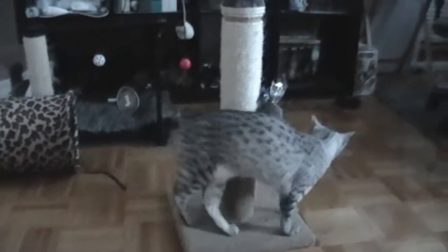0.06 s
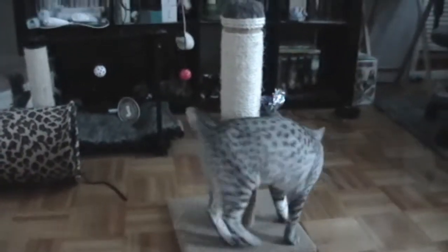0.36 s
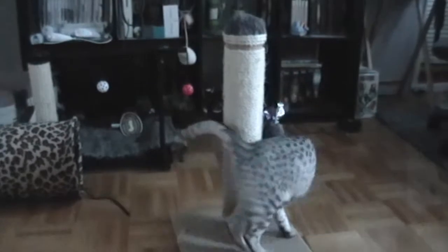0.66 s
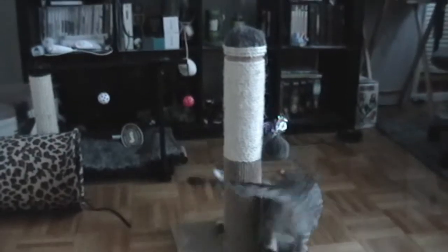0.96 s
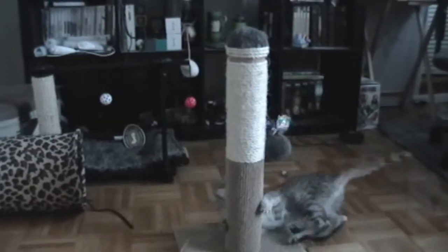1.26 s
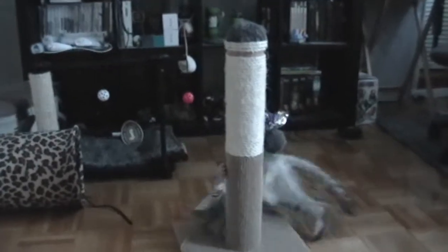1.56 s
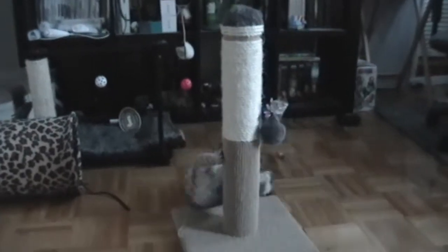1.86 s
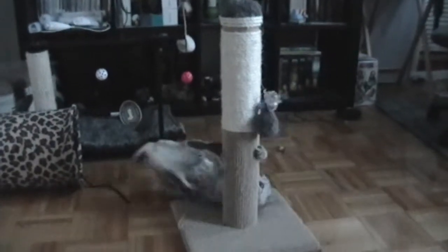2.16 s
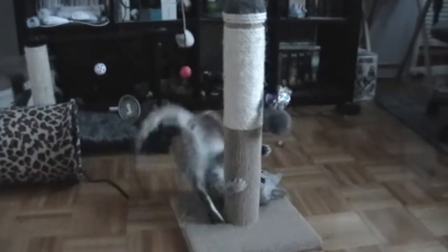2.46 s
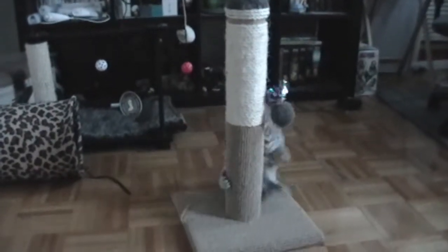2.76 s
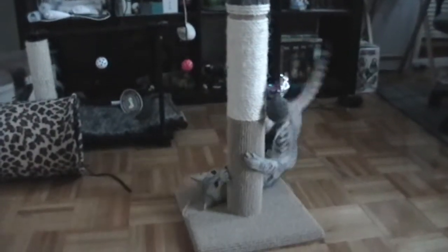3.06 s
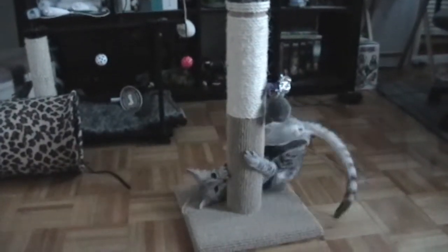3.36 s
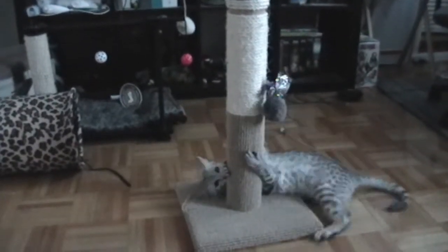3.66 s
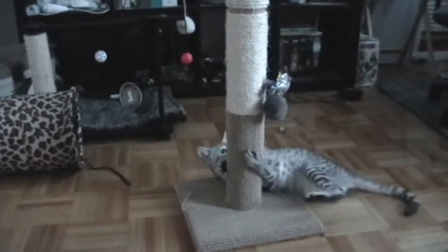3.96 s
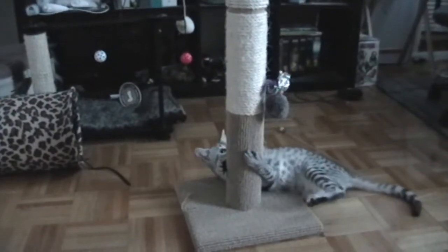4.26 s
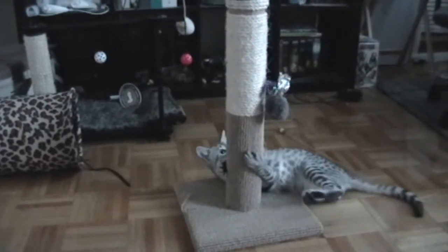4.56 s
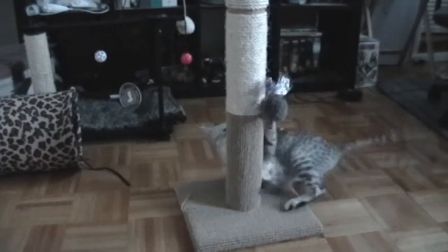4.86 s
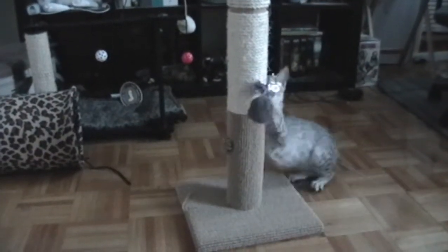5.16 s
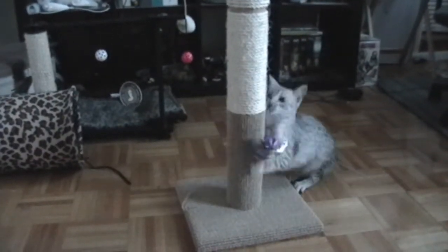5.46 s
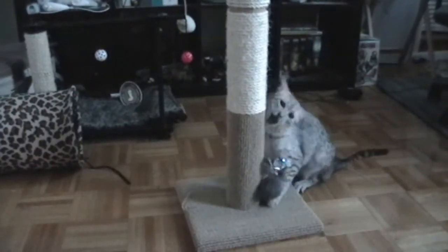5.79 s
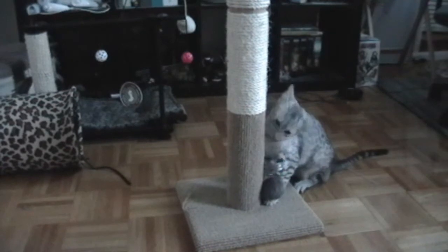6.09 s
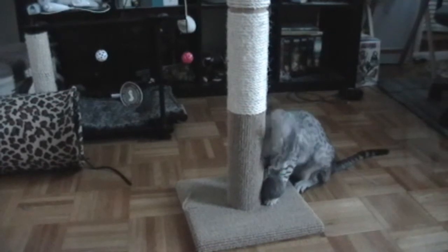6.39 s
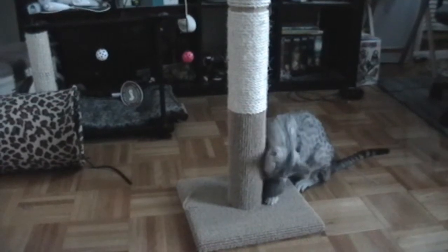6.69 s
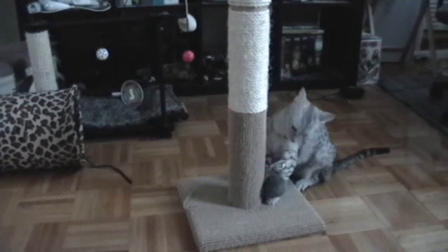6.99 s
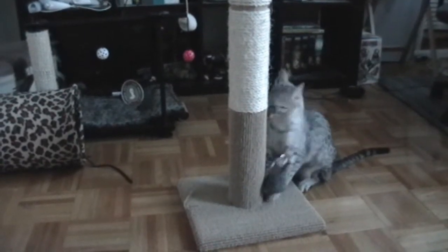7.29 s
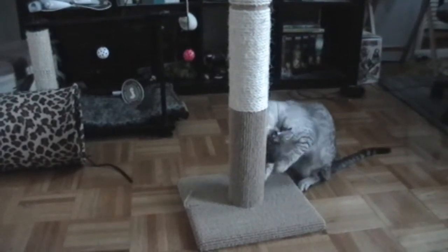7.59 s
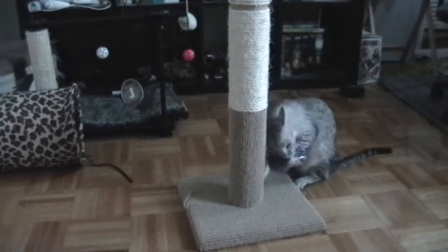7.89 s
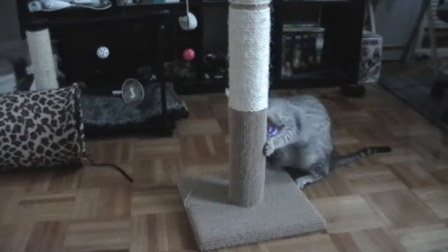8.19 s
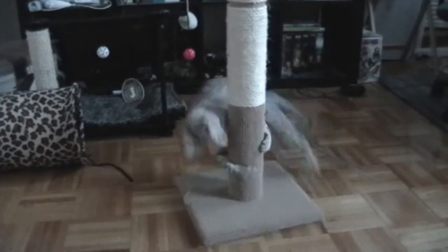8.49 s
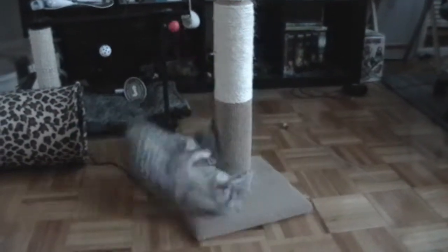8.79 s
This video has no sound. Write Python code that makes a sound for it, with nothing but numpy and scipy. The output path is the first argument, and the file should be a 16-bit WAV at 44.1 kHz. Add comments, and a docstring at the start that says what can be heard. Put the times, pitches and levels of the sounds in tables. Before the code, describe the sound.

A kitten's claws rasp and snap on a rope scratching post, with soft thumps and the crinkle of a foil toy indoors.

```python
"""A kitten claws a rope-wrapped scratching post in a living room with a parquet floor.
Its claws rasp over the fibres in tiny stick-slip grains, rip through them and snap free; its body
thumps the carpeted base. It bats and paws a dangling toy whose foil tuft crinkles and swishes and whose
trinket tinkles. Paws and toy brush the carpet. The room answers briefly and hums softly underneath."""
import sys
import numpy as np
from scipy import signal
from scipy.fft import rfft, irfft, next_fast_len
from scipy.io import wavfile

SR = 44100
rng = np.random.default_rng(int(sys.argv[2]) if len(sys.argv) > 2 else 0)


def wrap_up_sound(samples):
    """Save the sound to the file named by the first command line argument, as 16-bit audio."""
    columns = np.atleast_2d(samples).T
    # keep every value between -1 and 1, then stretch to whole-number steps
    tamed = np.clip(columns, -1, 1)
    steps = np.round(tamed * 32767).astype(np.int16)
    wavfile.write(sys.argv[1], SR, steps)


N = 389844
TOP_HZ, HIT_SAMPLES = 14600, 8192

# Claws snapping free of the rope (all cue levels are pre-fader): start_s, level_db, pitch_hz, width_oct
CLAW_SNAPS = [(1.2157, -35.5, 4500, 0.66), (1.3506, -50, 4000, 0.97), (1.4083, -37, 3200, 1.06),
              (1.451, -23.5, 2300, 1.04), (1.5278, -35.5, 2940, 0.83), (1.5425, -43, 5000, 0.88),
              (1.554, -43, 6000, 0.6), (1.5975, -37.5, 4000, 1.7), (1.668, -33.5, 3740, 0.81),
              (1.7882, -39, 4000, 0.74), (1.846, -42, 2200, 0.72), (1.9434, -25, 2970, 0.6),
              (1.946, -25, 4500, 0.32), (2.0799, -24.5, 3320, 0.8), (2.1666, -26, 3830, 0.86),
              (2.2809, -22.5, 3730, 0.78), (2.2965, -24.5, 3420, 1), (2.348, -33, 5500, 0.87),
              (2.3634, -25, 3340, 0.66), (2.4052, -24, 3350, 0.43), (2.4313, -37, 3260, 0.44),
              (2.4553, -25, 2080, 0.32), (2.559, -37, 3500, 1.1), (2.5675, -27.5, 1220, 0.81),
              (2.603, -31, 4000, 0.97), (2.6086, -29.5, 4020, 1.26), (2.6631, -29, 3000, 1.24),
              (2.701, -21, 2960, 1.15), (2.7464, -24.5, 1920, 0.63), (2.7858, -31, 5960, 0.45),
              (2.797, -26.5, 1990, 1.7), (2.926, -24, 2770, 0.7), (2.9819, -20, 3140, 1.18),
              (2.9962, -25, 4800, 0.26), (3.0236, -30, 4500, 0.74), (3.163, -36, 2100, 0.76),
              (3.2287, -44, 4500, 1.2), (3.343, -39, 3900, 1.15), (3.3654, -45, 4040, 0.7),
              (3.6481, -29.5, 3800, 1.1), (3.729, -40.5, 4500, 1.1), (3.734, -45, 4500, 1),
              (3.7773, -38.5, 3930, 0.75), (3.7919, -45, 4000, 0.41), (3.8966, -53, 5500, .9),
              (4.6938, -21.5, 2760, 1.03), (4.7081, -24.5, 2940, 0.87), (4.715, -27.5, 2600, 0.88),
              (4.9073, -36.5, 2000, .5), (4.939, -32.5, 4500, 0.67), (4.9632, -26, 4940, 0.59),
              (5.0042, -30, 5200, 0.62), (5.0485, -28, 4630, 1.12), (5.0982, -35.5, 4950, 0.5),
              (5.1655, -31, 5150, 0.54), (5.18, -23.5, 3680, 0.86), (5.1829, -29.5, 3020, 0.76),
              (8.3532, -29, 3380, 0.81), (8.398, -28.5, 5000, 0.69), (8.4079, -32, 4800, 0.74),
              (8.5714, -27, 2750, 0.54), (8.639, -27, 5470, 0.48), (8.677, -22, 1490, 0.84),
              (8.6845, -24.5, 1890, .7), (8.7142, -19.5, 2340, 1.3)]
def claw_snaps():
    """A fibre creaks under strain, lets go, and the claw catches again within a millisecond or two."""
    return on_post(snaps(CLAW_SNAPS, catch_gap_s=.0004, catch_gain=0.5))


# Louder rips along the rope, one of them the body sliding low against the post at 1.22 s: start_s, level_db,
# length_s, pitch_hz
CLAW_RIPS = [(1.063, -47, .016, 3660), (1.206, -45.5, 0.027, 3770), (1.223, -51.5, 0.046, 326),
             (1.452, -41, 0.0049, 700), (1.538, -45, 0.011, 6000), (1.596, -42, 0.012, 3480),
             (1.646, -40, 0.043, 3250), (1.789, -41.5, 0.018, 1180), (1.84, -45.5, .007, 1870),
             (1.871, -47.5, 0.013, 1890), (1.942, -34.5, 0.019, 3100), (2.074, -32, 0.0083, 2230),
             (2.159, -40.5, 0.034, 2500), (2.21, -44, 0.016, 1000), (2.262, -37, 0.058, 3040),
             (2.677, -35.5, 0.02, 3050), (2.784, -34, 0.02, 3260), (3.0, -41, 0.022, 4200),
             (3.023, -27, .016, 3450), (3.304, -47, 0.019, 1100), (3.444, -45, 0.019, 2880),
             (3.468, -34.5, 0.035, 3720), (3.644, -36, 0.011, 2500), (4.695, -34.5, 0.041, 2430),
             (4.767, -38, 0.0083, 2480), (4.841, -31, 0.0079, 5700), (4.909, -40.5, 0.013, 2070),
             (5.156, -39.5, 0.03, 3820), (8.397, -39.5, 0.027, 4150), (8.638, -31, 0.011, 2800),
             (8.677, -32.5, 0.016, 1800), (8.715, -34.5, 0.018, 2100)]
def claw_rips():
    """Claws tear through the fibres, and once the body slides low against the post; a short, quiet tear also
    sits under every snap."""
    strong_rips = [(*row, 0.99) for row in CLAW_RIPS]  # width in octaves
    tears = [(start_s, db - 25, .012, pitch_hz, octaves) for start_s, db, pitch_hz, octaves in CLAW_SNAPS]
    return on_post(rips(strong_rips + tears, per_s=4000, scatter_db=5.0))


# Claw strokes on the rope: start_s, length_s, level_db
CLAW_DRAGS = [(1.22, 0.059, -49), (1.41, 0.34, -47), (1.82, 0.4, -45.5), (2.2, 0.33, -43),
              (2.55, 0.34, -43.5), (2.94, 0.23, -43), (3.63, 0.068, -43.5), (4.69, 0.076, -41),
              (4.89, 0.53, -49), (8.35, 0.048, -44.5), (8.5, 0.089, -38), (8.64, 0.15, -41.5)]
# Tone of the rope: freq_hz, gain_db
ROPE_EQ = [(40, -55), (200, -8), (400, -4.5), (580, 7), (800, 2.5), (1150, 2.5), (1900, 0), (3400, -9.5),
           (6000, -10), (9000, -12), (11500, -13), (14000, -42)]
def rope_rasp():
    """Dragging claws stick and slip over the fibres, more scrape than fizz."""
    pressure = strokes(CLAW_DRAGS, attack_s=0.0009, release_s=0.055, arch_db=6.0)
    return rasp(pressure, crackle(ROPE_EQ, per_s=1000, scatter_db=6.0),
                split_hz=2800, scrape_db=-2.0, fizz_db=-9.5)


# Hollow ring of the post: freq_hz, width_hz, gain_db
POST_MODES = [(575, 173, 10), (810, 86, 6), (1900, 820, -7), (6620, 4200, -4.5)]
def on_post(x, travel_s=0.000788, at_hz=996, front_hz=6900):
    """The post rings under a contact; treble travels faster in it, so each click chirps downwards."""
    lag_cycles = lambda hz: travel_s * np.sqrt(at_hz) * (2 * np.sqrt(hz) - hz / np.sqrt(front_hz))
    return filtered(x, lambda hz: (1 + modes(POST_MODES, hz)) * np.exp(-2j * np.pi * lag_cycles(hz)))


# Body or paw landing on the base: start_s, level_db, pitch_hz, weight_vs_contact_db
BODY_THUMPS = [(.977, -42.5, 145, -15), (1.079, -36, 133, -9), (1.245, -47, 320, -20),
               (1.47, -52, 110, -15), (1.692, -47.5, 157, -3), (1.772, -35.5, 181, -21),
               (1.794, -35.5, 211, -20), (2.0595, -31.5, 185, -1.5), (2.075, -37, 302, -15),
               (2.178, -37.5, 290, -20), (2.26, -30.5, 210, -4), (2.268, -27, 350, 0),
               (2.294, -26, 382, -11.5), (2.331, -31.5, 320, -8), (2.376, -41.5, 370, -17),
               (2.795, -43, 282, -12), (3.03, -49, 280, -10), (3.117, -39.5, 420, -21),
               (3.126, -37, 239, -15), (3.647, -37.5, 190, -21), (4.696, -37.5, 272, -12),
               (4.844, -26.5, 235, -12), (5.385, -49.5, 200, -10), (5.46, -48.5, 220, -9),
               (8.523, -43, 294, -17), (8.64, -25.5, 255, -14), (8.714, -34, 310, -13),
               (8.805, -43, 150, -18)]
# Woody ring of post and base: freq_hz, width_hz, gain_db
BASE_MODES = [(62.5, 5.1, 15), (134, 37, 5.5), (172, 64, -3), (285, 71, 4.5), (347, 42, 6), (517, 85, 4.5),
              (770, 640, 8)]
def body_thumps(rattle_gain=0.055, rattle_s=0.011, weight_lag_s=0.0061):
    """A blow rings the post and its base, which rocks briefly; the body's weight settles just after."""
    out, t = np.zeros(N), np.arange(HIT_SAMPLES) / SR
    weight = resonate(signal.unit_impulse(HIT_SAMPLES), pitch_hz=117, octaves=0.37, low_hz=90)
    for start_s, db, pitch_hz, weight_db in BODY_THUMPS:
        blow = rattle_gain * rng.standard_normal(HIT_SAMPLES) * np.exp(-t / rattle_s)
        blow[0] += 1
        thud = resonate(blow, pitch_hz, octaves=0.64, low_hz=74.6)
        add(out, start_s, filtered(thud, lambda hz: modes(BASE_MODES, hz)), db, hold_s=0.019)
        add(out, start_s + weight_lag_s, weight, db + weight_db, hold_s=0.019)
    return out


# Featured pops of the toy's foil: start_s, level_db, pitch_hz
FOIL_POPS = [(0.563, -60, 7500), (.7648, -56, 6500), (2.4544, -23.5, 5900), (2.456, -21, 6180),
             (4.9488, -31, 6300), (4.98, -29, 6100), (4.982, -30, 6100), (5.069, -37, 6800),
             (5.082, -37, 6500), (5.3718, -31, 6500), (5.377, -28.5, 6300), (5.446, -29.5, 4870),
             (5.499, -38, 9000), (5.5237, -39, 5950), (5.5624, -45, 7000), (5.579, -38, 6700),
             (5.6573, -31, 4770), (5.71, -36, 6400), (5.749, -40, 7500), (5.775, -39, 7700),
             (5.7794, -41, 7700), (5.812, -38.5, 7600), (5.8188, -44, 6500), (5.824, -41.5, 5500),
             (5.855, -37, 7820), (5.86, -42, 7000), (5.875, -41.5, 6260), (5.8881, -42, 5800),
             (5.9031, -45, 6800), (5.928, -47, 7000), (5.951, -48, 5000), (5.9899, -42.5, 4580),
             (6.455, -44.5, 8200), (6.503, -43, 9500), (6.5476, -36.5, 4160), (6.605, -40, 7000),
             (6.618, -44, 7500), (6.667, -43, 9000), (6.71, -42, 6000), (6.7715, -41, 8000),
             (6.775, -42, 9000), (6.8175, -44, 8500), (6.9324, -43, 9600), (7.0015, -42.5, 10100),
             (7.4805, -60, 6500), (7.52, -62, 5000), (7.587, -50, 9500), (7.695, -37, 10400),
             (7.817, -44, 6400), (7.9684, -39.5, 7100), (8.151, -29, 7900), (8.2099, -23, 6160),
             (8.215, -26, 4900), (8.225, -18, 5900), (8.229, -21, 6200), (8.242, -25.5, 5000),
             (8.248, -30, 5950), (8.263, -34, 7400), (8.2925, -34, 5300), (8.327, -37.5, 5460)]
def foil_pops(grip, crinkles_per_s=110, threshold_db=-52, crinkle_hz=6800, width_oct=0.32):
    """Creases pop; a firm enough grip adds small random crinkles that grow louder with it."""
    count = int(crinkles_per_s * N / SR)
    places, chances = rng.integers(N, size=count), rng.standard_normal((count, 2))
    excess_db = 20 * np.log10(grip[places] + 1e-20) - threshold_db
    crinkles = [(place / SR, -55 + 0.13 * excess + 3 * accent, crinkle_hz * 2 ** (0.25 * detune))
                for place, excess, (accent, detune) in zip(places, excess_db, chances) if excess > 0]
    creases = [(*row, width_oct) for row in FOIL_POPS + crinkles]
    return on_toy(snaps(creases, catch_gap_s=.0005, catch_gain=0.61))


# Paws gripping the foil: start_s, length_s, level_db
FOIL_GRIPS = [(4.92, 0.089, -36), (5.315, 0.37, -42), (5.69, 0.31, -49), (7.45, 0.76, -60.5),
              (7.86, 0.14, -49), (8.13, 0.13, -36.5), (8.4, 0.13, -39.5), (8.5, 0.096, -41),
              (8.71, 0.15, -34.5)]
def foil_grip():
    """Paw pressure on the foil, which drives its rustle and its crinkles."""
    return strokes(FOIL_GRIPS, attack_s=0.0046, release_s=0.019, arch_db=3.0)


# Tone of the foil: freq_hz, gain_db
FOIL_EQ = [(60, -50), (350, -2.5), (650, 1), (1150, -1), (1420, -1), (1690, 0.5), (2430, -3), (3020, -1.5),
           (3600, -4.5), (4800, 2), (7060, 3), (13800, -7.5), (15000, -41)]
def foil_rustle(grip):
    """Handled foil sticks and slips, more fizz than scrape."""
    return rasp(grip, crackle(FOIL_EQ, per_s=1500, scatter_db=4.5),
                split_hz=3800, scrape_db=-9.5, fizz_db=-4.5)


# Paw swipes at the toy: start_s, level_db, length_s
TOY_SWIPES = [(.265, -56, 0.0088), (0.3, -58, 0.0065), (0.76, -53.5, 0.032), (4.927, -39.5, 0.056),
              (5.338, -29.5, 0.017), (5.35, -39.5, 0.06), (5.568, -44.5, 0.033), (5.599, -35, 0.033),
              (5.748, -39.5, 0.0092), (7.694, -50.5, 0.018), (7.874, -37.5, 0.035), (8.109, -28.5, .01),
              (8.176, -35.5, 0.02), (8.207, -31, 0.035), (8.513, -33.5, 0.022)]
def toy_swipes(pitch_hz=8900, width_oct=0.83):
    """A paw skims the foil in a bright swish of dense slips."""
    return on_toy(rips([(*row, pitch_hz, width_oct) for row in TOY_SWIPES], per_s=12000, scatter_db=6.0))


# Ring of the foil tuft: freq_hz, width_hz, gain_db
TUFT_MODES = [(1800, 480, 11.5), (4650, 340, -14), (5670, 480, -4), (6830, 2600, -3.5)]
def on_toy(x):
    """The foil tuft adds its thin ring to a contact."""
    return filtered(x, lambda hz: 1 + modes(TUFT_MODES, hz))


# Shakes of the toy's trinket: start_s, level_db
TINKLES = [(.008, -60.5), (.06, -59), (.138, -60), (.232, -60.5), (8.23, -36.5)]
# Partials of the trinket: freq_hz, level_db, t60_s
TRINKET_PARTIALS = [(4700, -8, 0.0053), (5500, -1, 0.0046), (6500, 6, 0.0032), (8060, 5, 0.0051),
                    (12600, -10, .004)]
def trinket_tinkles(detune=0.037, rattle_s=0.048):
    """The swinging toy's trinket rattles faintly, a little differently each time."""
    out, t = np.zeros(N), np.arange(HIT_SAMPLES) / SR
    for start_s, db in TINKLES:
        ring = np.zeros(HIT_SAMPLES)
        for hz, partial_db, t60_s in TRINKET_PARTIALS:
            decay = amp(partial_db + rng.normal(0, 3) - 60 * t / t60_s)
            ring += decay * np.sin(2 * np.pi * hz * rng.normal(1, detune) * t)
        rattle = rng.standard_normal(HIT_SAMPLES) * np.exp(-t / rattle_s)
        add(out, start_s, signal.fftconvolve(ring, rattle)[:HIT_SAMPLES], db, hold_s=0.035)
    return out


# The toy rubbed on the carpet: start_s, length_s, level_db
TOY_RUBS = [(6.195, 0.017, -53), (6.325, 0.041, -55.5), (6.44, 0.063, -53), (6.51, 0.43, -39.5),
            (8.04, 0.16, -35.5)]
# Paws brushing the carpet: start_s, length_s, level_db
PAW_BRUSHES = [(0, 0.31, -78), (.48, 0.34, -77), (.95, 0.085, -65.5), (1.06, 0.068, -66),
               (1.22, 0.041, -65), (1.34, .05, -66), (3.76, 0.15, -82), (4.24, .012, -71),
               (4.365, .03, -76)]
# Tone of the rubbed pile: freq_hz, gain_db
CARPET_EQ = [(710, -16), (1200, -2.5), (1450, -24), (1560, -2), (1790, -8.5), (3040, 1.5), (4000, -6),
             (4840, -4.5), (7230, -2), (11600, -3.5), (13500, -5), (14400, -3), (15000, -24)]
def carpet_rubs():
    """The pile crackles finely: grainy under the toy, smoother under the paws."""
    toy = strokes(TOY_RUBS, attack_s=0.0025, release_s=0.0048, arch_db=7.0)
    toy *= unit(crackle(CARPET_EQ, per_s=2200, scatter_db=6.0))
    paws = strokes(PAW_BRUSHES, attack_s=0.0064, release_s=.025, arch_db=0)
    paws *= unit(crackle(CARPET_EQ, per_s=2500, scatter_db=1.5))
    return amp(-4) * toy + amp(4.5) * paws


# Reverb time of the room: freq_hz, t60_s
ROOM_DECAY = [(100, 0.45), (500, 0.27), (1400, 0.27), (3700, 0.47), (9700, 0.31), (15000, 0.28)]
# Stereo image of the reverb: freq_hz, left_right_correlation
ROOM_IMAGE = [(100, 0.96), (500, 1), (1500, 0.57), (4000, 0.37), (8000, 0.87), (13000, 0.19)]
def room_reverb(x, build_s=0.00055, stretches=16):
    """The room's answer changes as the kitten moves about: each stretch gets a fresh noise tail."""
    out, hop = np.zeros((2, N + 2 * SR)), N // stretches + 1
    for start in range(0, N, hop):
        hz, t, noise = signal.stft(rng.standard_normal((2, SR // 2)), SR, nperseg=256)
        decay = amp(-60 * t / curve(ROOM_DECAY, hz)[:, None]) * (1 - np.exp(-t / build_s))
        tail = signal.istft(noise * decay, SR, nperseg=256)[1]
        wet = signal.fftconvolve(x[None, start:start + hop], tail / np.linalg.norm(tail[0]), axes=1)
        out[:, start:start + wet.shape[1]] += wet
    return stereo(out[:, :N], ROOM_IMAGE)


# Tone of the room's air: freq_hz, gain_db
AIR_EQ = [(25, -47), (55, -19.5), (100, -4.5), (220, -5.5), (286, -4), (420, -10), (560, -8), (800, -7),
          (1000, -13), (1800, -16), (4000, -27.5), (8000, -32), (12000, -39), (15000, -56)]
# Stereo image of the air: freq_hz, left_right_correlation
AIR_IMAGE = [(60, 0.69), (180, 0.78), (550, 0.49), (1650, 0.18), (4970, 0.25), (15000, 0.59)]
# The room's hum: freq_hz, level_db
HUM_TONES = [(290.7, -65), (398.4, -67), (640.6, -71.5), (1303, -73), (1793, -93)]
def room_tone(linewidth_hz=4):
    """A steady bed of rushing air with a few faint, wavering tones."""
    air = filtered(stereo(rng.standard_normal((2, N)), AIR_IMAGE), lambda hz: amp(curve(AIR_EQ, hz)))
    hum, t = np.zeros(N), np.arange(N) / SR
    for hz, db in HUM_TONES:
        drift = np.cumsum(rng.standard_normal(N)) * np.sqrt(2 * np.pi * linewidth_hz / SR)
        hum += amp(db) * np.sqrt(2) * np.sin(2 * np.pi * hz * t + drift)
    return amp(-53) * unit(air) + amp(-1) * hum


def snaps(rows, catch_gap_s, catch_gain, strain_s=0.0052, settle_s=0.00076, lead=400):
    """Chatter swells under strain up to a click, followed by three ever weaker catches."""
    out, t = np.zeros(N), (np.arange(HIT_SAMPLES) - lead) / SR
    swell = np.exp(np.maximum(np.minimum(t / strain_s, -t / settle_s), -20))
    for start_s, db, pitch_hz, octaves in rows:
        force = 0.015 * rng.standard_normal(HIT_SAMPLES) * swell
        force[lead] += 1
        catches = lead + np.cumsum(rng.uniform(.5, 2, size=3) * catch_gap_s * SR).astype(int)
        force[catches] += rng.choice([-1, 1], size=3) * catch_gain ** np.arange(1, 4)
        add(out, start_s - lead / SR, resonate(force, pitch_hz, octaves), db, hold_s=0.0021)
    return out


def rips(rows, per_s, scatter_db):
    """Runs of slips that swell as the claw or paw digs in and stop as it leaves."""
    out = np.zeros(N)
    for start_s, db, length_s, pitch_hz, octaves in rows:
        t = np.arange(int(2 * length_s * SR)) / SR
        stroke = (1 - np.exp(-t / (0.15 * length_s))) * np.exp(-(t / length_s) ** 4 / 2)
        grains = stroke * slips(per_s, scatter_db, len(t))
        add(out, start_s, resonate(grains, pitch_hz, octaves), db, length_s)
    return out


def slips(per_s, scatter_db, size, decay_s=0.00017, grain_samples=32):
    """Tiny stick-slip grains at random moments, each with its own pitch and strength."""
    when, height, phase, chance = rng.random((int(per_s * size / SR), 4)).T[:, :, None]
    t = np.arange(grain_samples) / SR
    strength = np.sqrt(height) * amp(-scatter_db * np.log(chance + .03))
    grains = strength * np.sin(2 * np.pi * (TOP_HZ * height ** 2 * t + phase)) * np.exp(-t / decay_s)
    places = (when * size).astype(int) + np.arange(grain_samples)
    return np.bincount(places.ravel(), grains.ravel(), size)[:size]


def crackle(eq, per_s, scatter_db):
    """A steady stream of slips in the tone of a material."""
    return filtered(slips(per_s, scatter_db, N), lambda hz: amp(curve(eq, hz)))


def rasp(pressure, grains, split_hz, scrape_db, fizz_db):
    """Grains split into dull scrape and bright fizz, both riding the pressure."""
    scrape = filtered(grains, lambda hz: 1 / (1 + (hz / split_hz) ** 6))
    return pressure * (amp(scrape_db) * unit(scrape) + amp(fizz_db) * unit(grains - scrape))


def strokes(rows, attack_s, release_s, arch_db):
    """Pressure envelope: each stroke sets in, arches by arch_db at its middle and lets go."""
    out, t = np.zeros(N), np.arange(N) / SR
    for start_s, length_s, db in rows:
        span = slice(int(start_s * SR), int((start_s + length_s + 6 * release_s) * SR))
        age = t[span] - t[span][0]
        off_centre = np.minimum((2 * age / length_s - 1) ** 2, 1)
        attack = 1 - np.exp(-age / attack_s)
        release = np.exp(-np.maximum(age - length_s, 0) / release_s)
        out[span] += amp(db - arch_db * off_centre) * attack * release
    return out


def resonate(x, pitch_hz, octaves, low_hz=280):
    """A broad causal resonance around a pitch; dull contacts are soft and lose their top."""
    hz = np.fft.rfftfreq(HIT_SAMPLES, 1 / SR) + 1
    gain = np.exp(-(np.log2(hz / pitch_hz) / (2 * octaves)) ** 2) / np.sqrt(hz / pitch_hz)
    gain /= np.sqrt(1 + (hz / (8200 + 0.99 * pitch_hz)) ** 16 + (low_hz / hz) ** 4)
    cepstrum = irfft(np.log(gain + 1e-3))
    cepstrum[1:HIT_SAMPLES // 2] *= 2  # minimum phase keeps the attack sharp
    cepstrum[HIT_SAMPLES // 2 + 1:] = 0
    return irfft(rfft(x, HIT_SAMPLES) * np.exp(rfft(cepstrum)) * (hz < TOP_HZ))


def modes(table, hz):
    """Summed response of a few resonances."""
    return sum(amp(db) * bandpass(hz, centre, width) for centre, width, db in table)


def bandpass(hz, centre, width):
    """Causal response of one resonance."""
    return 1j * hz * width / (centre ** 2 - hz ** 2 + 1j * hz * width)


def stereo(pair, image):
    """Two unrelated signals become left and right with a given correlation."""
    angle = lambda hz: np.arccos(curve(image, hz)) / 2
    mid, side = filtered(pair, lambda hz: np.array([np.cos(angle(hz)), np.sin(angle(hz))]))
    return np.array([mid + side, mid - side])


def filtered(x, response):
    """Apply a frequency response."""
    size = x.shape[-1]
    padded = next_fast_len(size + HIT_SAMPLES // 4)
    return irfft(rfft(x, padded) * response(np.fft.rfftfreq(padded, 1 / SR)), padded)[..., :size]


def add(track, start_s, sound, db, hold_s):
    """Mix in a sound with the energy of db held for hold_s."""
    part = track[max(round(start_s * SR), 0):][:len(sound)]
    part += (amp(db) * sound * np.sqrt(hold_s * SR / (np.sum(sound ** 2) + 1e-20)))[:len(part)]


def curve(points, hz):
    """Read breakpoints on a log frequency axis."""
    freqs, values = np.transpose(points)
    return np.interp(np.log(hz + 1), np.log(freqs + 1), values)


def amp(db):
    """Decibels to gain."""
    return 10 ** (np.asarray(db) / 20)


def unit(x):
    """Scale to rms 1."""
    return x / np.sqrt(np.mean(x ** 2) + 1e-20)


def scene():
    """Post, toy and carpet, mixed with their reverb over the room tone."""
    grip = foil_grip()
    friction = rope_rasp() + foil_rustle(grip) + carpet_rubs()
    friction += amp(-3.5) * (claw_rips() + toy_swipes())
    tinkles = amp(-0.5) * trinket_tinkles()
    clicks = amp(-2.0) * claw_snaps()
    pops = amp(-1.0) * foil_pops(grip)
    thumps = amp(-1.5) * body_thumps()
    send = amp(-2.5) * (friction + tinkles + clicks) + amp(-10.5) * pops + amp(-3.0) * thumps
    return friction + tinkles + clicks + pops + thumps + room_reverb(send) + room_tone()


# Dips in the master EQ: freq_hz, width_hz, depth_fraction
MASTER_DIPS = [(480, 92, 0.98), (1445, 61, 1), (1095, 820, 0.47)]
# Stereo balance: freq_hz, left_minus_right_db
BALANCE = [(60, -2.5), (180, -2.5), (550, -0.5), (1650, 0.0), (4970, 0.0), (15000, 0.5)]
# Phase between the sides: freq_hz, left_lead_rad
PHASE_LEAD = [(0, -0.26), (1030, 0.49), (9990, -0.7), (14300, -1), (14600, -1.5), (15200, -0.3)]
def record(dry):
    """Master: two narrow notches and a broad dip, slightly unequal sides, a steep high cut."""
    def response(hz):
        dips = np.prod([1 - depth * bandpass(hz, centre, width)
                        for centre, width, depth in MASTER_DIPS], axis=0)
        sides = np.array([[.5], [-.5]])
        image = amp(sides * curve(BALANCE, hz)) * np.exp(1j * sides * curve(PHASE_LEAD, hz))
        return dips * image / np.sqrt(1 + (hz / TOP_HZ) ** 120)
    return filtered(dry, response)


dry = scene()
out = record(dry)
wrap_up_sound(out)
```